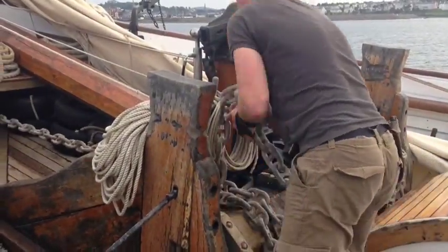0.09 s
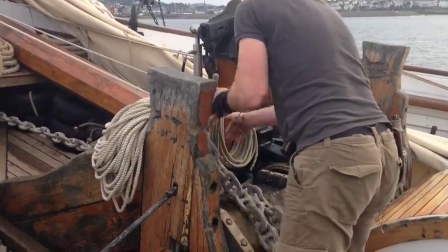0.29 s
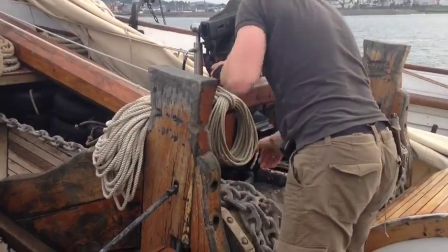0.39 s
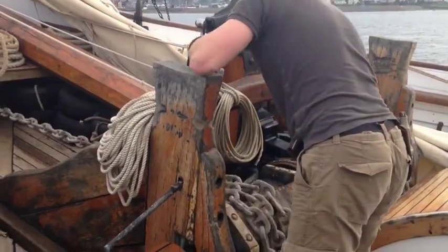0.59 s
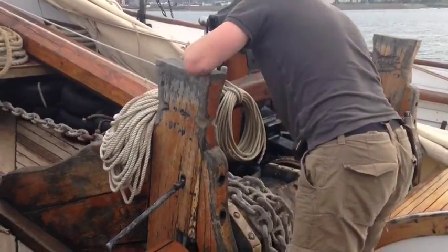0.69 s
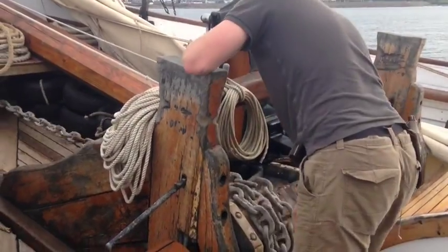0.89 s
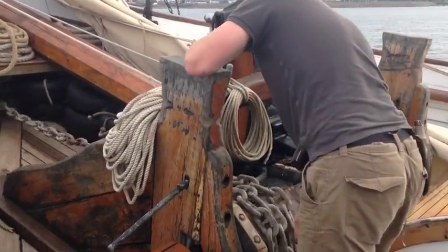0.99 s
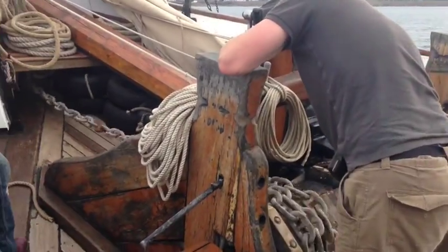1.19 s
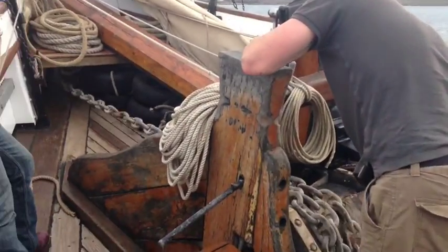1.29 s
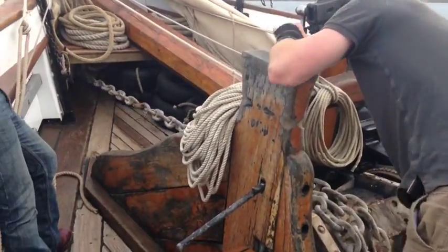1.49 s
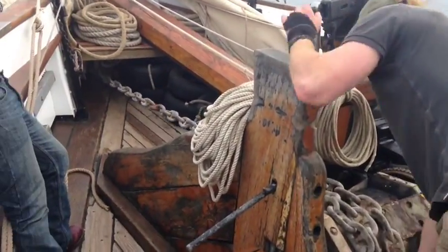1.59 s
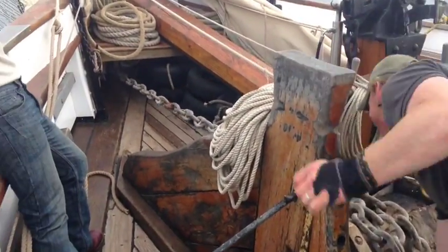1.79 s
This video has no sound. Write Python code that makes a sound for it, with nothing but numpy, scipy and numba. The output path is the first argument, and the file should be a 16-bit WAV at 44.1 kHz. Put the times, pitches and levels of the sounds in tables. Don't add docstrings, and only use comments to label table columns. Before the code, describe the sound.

Iron chain links scrape and tap on wood, tumble in a loud clanking burst with a low boom, quieten, then jerk again with hard clinks and knocks; outdoors on a ship, phone about two metres away.

```python
import sys
import numpy as np
from scipy import signal
from scipy.io import wavfile
from scipy.ndimage import uniform_filter1d
from numba import njit

SR = 44100
rng = np.random.default_rng(int(sys.argv[2]) if len(sys.argv) > 2 else 0)


def unload_wav(signal):
    wavfile.write(
        sys.argv[1],
        SR,
        np.round(np.clip(np.atleast_2d(signal).T, -1, 1) * 32767).astype(np.int16),
    )


def attenuation_scalar(level_db):
    decades = np.asarray(level_db, float) / 20
    return 10 ** decades


N = 79380

# (time [s], peak level [dB], first ring [Hz], ring t60 [s])
CLINKS = [(0.0511, -18, 4620, 0.036), (0.1357, -36, 4730, 0.094), (0.1753, -17, 5370, 0.09),
          (0.188, -11.5, 4460, 0.04), (0.1953, -12, 4620, 0.088), (0.239, -21, 5380, 0.066),
          (0.2658, -27, 4860, 0.059), (0.2863, -13.5, 5320, 0.086), (0.3218, -13, 4830, 0.062),
          (0.3768, -6, 4790, 0.06), (0.3862, -8, 4920, 0.2), (0.3943, -10, 5160, 0.088),
          (0.4223, -4, 5200, 0.18), (0.4594, -3.5, 4570, 0.049), (0.4821, -2.5, 4773, 0.23),
          (0.493, -1, 5180, 0.1), (0.519, -8, 4930, 0.083), (0.545, -8.5, 4690, 0.17),
          (0.563, -8, 5200, 0.092), (0.586, -7, 4880, 0.1), (0.625, 1.5, 4690, 0.08),
          (0.6958, -17.5, 4860, 0.12), (0.723, -18, 5270, 0.088), (0.733, -12, 4800, 0.13),
          (0.7694, -10.5, 4967, 0.11), (0.804, -19, 4880, 0.097), (0.835, -23.5, 4900, 0.19),
          (0.901, -21.5, 5250, 0.11), (0.9332, -15, 4560, 0.023), (0.9579, -18.5, 4840, 0.12),
          (0.9932, -18, 4810, 0.046), (1.053, -19.5, 4770, 0.07), (1.0832, -20.5, 5390, 0.098),
          (1.1026, -3.5, 5215, 0.1), (1.1411, -3.5, 4757, 0.064), (1.217, -12.5, 4856, 0.075),
          (1.246, -6, 5035, 0.035), (1.251, 0.5, 4750, 0.045), (1.285, -21, 4730, 0.046),
          (1.3037, -17, 5270, 0.022), (1.318, -12.5, 5400, 0.015), (1.3257, -4, 4660, 0.04),
          (1.336, -11, 4670, 0.035), (1.3585, 6, 4970, 0.022), (1.375, -12, 4900, 0.03),
          (1.3834, -4.5, 4967, 0.052), (1.4076, -20, 4710, 0.046)]
# (frequency [Hz], level [dB], share of the ring t60 [1])
LINK_MODES = [(4880, 0, 0.72), (5270, -9, 0.99), (4690, -10.5, 0.81), (5043, -3, 0.74), (3280, -17.5, 0.32),
              (4247, -13, .25), (7590, -21.5, 0.28), (7908, -13, .55), (8140, -13.5, 0.63),
              (10800, -21.5, 0.86), (11650, -20.5, 0.94), (12724, -19, 0.45), (9300, -35.5, 0.29)]
# (time [s], loose rattle level [dB], drag over deck level [dB])
CHAIN_MOTION = [(0, -57, -35.5), (.13, -63, -45.5), (.21, -43, -30), (.364, -34.5, -30), (.378, -20, -25),
                (.54, -18.5, -20), (.64, -25, -32.5), (.72, -46, -31.5), (.86, -42.5, -38),
                (1.0, -49.5, -28), (1.2, -56, -29.5), (1.3, -42, -27.5), (1.42, -72, -24.5),
                (1.49, -96, -48)]
# (centre [Hz], width [Hz], amount taken out [dB])
RING_GAPS = [(6350, 1000, -1.5), (9100, 800, -3)]
# (time [s], peak level [dB], brightness [dB], scrape length [s])
KNOCKS = [(0.023, -26.5, -12.5, 0.022), (0.041, -29.5, -5, 0.013), (0.125, -35.5, -1.5, 0.0096),
          (0.151, -20.5, -19, 0.011), (0.161, -32, 0, 0.012), (0.1755, -18, -2, 0.008),
          (0.194, -24, 0, 0.006), (0.214, -14.5, -46, 0.012), (0.2406, -14.5, 3.5, 0.0042),
          (0.2645, -12, -1, 0.004), (0.282, -11, -22.5, 0.022), (0.372, -0.5, -16, 0.029),
          (0.41, -8.5, -12, 0.0076), (0.445, -2.5, -21.5, 0.028), (0.483, -10, -9.5, 0.012),
          (0.537, -22.5, -13.5, 0.0034), (0.583, -16, -6.5, 0.017), (.622, -11.5, -14.5, 0.017),
          (0.647, -6.5, -18.5, 0.015), (.775, -19, -5.5, 0.0066), (0.854, -16, -17, 0.027),
          (0.881, -12.5, -20.5, 0.016), (0.939, -25, -1.5, 0.022), (0.987, -9.5, -6.5, 0.015),
          (1.054, -1, -14, 0.017), (1.144, -18.5, -3, 0.014), (1.211, -21.5, -4, 0.0094),
          (1.243, -14.5, -7.5, 0.015), (1.264, -2.5, -12, 0.012), (1.299, -14, -10, 0.015),
          (1.378, -23.5, 2, 0.021), (1.406, -14, -4, 0.015)]
# (centre [Hz], width [Hz], level [dB])
DECK = [(130, 153, -4), (233, 100, -1), (347.7, 102, -2), (488, 61, 1), (683, 210, -7)]
# (centre [Hz], width [Hz], level [dB])
BEAM = [(870, 410, -6), (1206, 330, 4), (1364, 154, 7), (1639, 297, 3), (2026, 325, 0.5), (3605, 1350, -7),
        (6540, 10000, -22)]
# (time [s], level [dB], frequency [Hz])
THUDS = [(0.04, -6.5, 103.7), (.40, -9, 355), (.455, -10, 335), (.50, 4, 205), (.55, -10, 209),
         (.625, -14, 210), (1.019, -11, 104), (1.09, -17.5, 89.5), (1.219, -9, 105.3), (1.373, -7.5, 114.5),
         (1.454, -17, 110), (1.501, -23, 130)]
# (time [s], level [dB], frequency [Hz])
TAPS = [(.149, -18, 600), (0.186, -15, 468), (.219, -15.5, 490), (0.241, -24, 1650), (0.267, -21, 1500),
        (.288, -23, 600), (0.351, -13.5, 366), (0.3729, -1.5, 340), (.381, -13, 450), (0.391, -4, 420),
        (.441, -4.5, 330), (.468, -6, 300), (0.504, -5.5, 260), (0.65, -9.5, 280), (.66, -17, 450),
        (0.091, -30, 417), (.71, -25, 220), (0.778, -14, 1640), (.884, -14, 584), (.897, -19, 420),
        (0.907, -15.5, 500), (1.305, -18, 600), (1.409, -19, 1500)]
# (centre [Hz], width [Hz], level [dB])
PLANKS = [(128, 30, -7.5), (205, 96, -4.5), (365.6, 153, -1.5), (439, 144, -3.5)]
# (start [s], full [s], hold [s], end [s])
FALL_S = (.372, .38, .56, .72)
# (start [s], full [s], hold [s], end [s])
HUM_S = (.9, 1.0, 1.45, 1.58)
# (start [s], full [s], hold [s], end [s])
SLIDE_S = (.8, .9, 1.36, 1.44)
# (frequency [Hz], density [dB per Hz])
AIR_SPECTRUM = [(25, -15), (50, -0.5), (105, -3), (160, -24), (450, -23.5), (1600, -35), (2500, -49),
                (15000, -54)]
# (lowest [s], back at full
# level [s])
AIR_DIP_S = (1.53, 1.7)
# (start [s], end [s])
TOP_OPEN_S = [
    (0, .29),
    (.365, .40),
    (.86, 1.11),
    (1.16, 1.36),
    (1.46, 2),
]

BOUNCE_S, BOUNCE_DB = 0.006, -5
RATTLE_PER_S, RATTLE_T60_S, RATTLE_DB, RATTLE_SCATTER_DB = 200, 0.16, 0.5, 3
LINK_HZ, LINK_SPREAD = 4860, 0.02
MODE_SCATTER_DB, CONTACT_S = 3.5, 0.00071
SOFT_DULL = 0.27
TICK_DB, TICK_S = -16.5, 0.0062
DRAG_PER_S, DRAG_SCATTER_DB, DRAG_BEAM_DB = 660, 2.5, -15.5
THUD_T60_S, TAP_CYCLES = 0.081, 6
HUM_HZ, HUM_DB, FALL_DB = 113.7, -32.5, -14.5
SLIDE_DB, AIR_DB, AIR_DIP_DB = -52, -37, -8
ECHO_T60_S, ECHO_DB = 0.12, -13
CLIP, SHELF_DB = 0.95, -5


def links():
    at, db, hz, t60 = np.array(CLINKS).T
    chance = rng.random((len(at), 2)).T
    out = strike(at, db - 4, hz, t60)
    for k in (1, 2):
        delay = BOUNCE_S * t60 / 0.078 * (k - 0.6 + chance[k - 1])
        bounce_hz = hz * (1 + 0.02 * (chance[2 - k] - 0.5))
        out = out + strike(at + delay, db - 5 + k * BOUNCE_DB, bounce_hz, t60)

    wait, size, pitch = rng.random((500, 3)).T
    at = np.cumsum(-np.log(wait + 1e-9)) / RATTLE_PER_S
    db = 20 * np.log10(motion_gain(at, 1)) + RATTLE_DB - RATTLE_SCATTER_DB * np.log(size + 0.051)
    db = np.where(at < 1.45, db, -150)
    hz = LINK_HZ * (1 + LINK_SPREAD * (2 * pitch - 1))
    return out + strike(np.minimum(at, 1.6), db, hz, np.full(len(at), RATTLE_T60_S))


def strike(at, db, hz, t60):
    out, tick = np.zeros(N), np.zeros(N)
    mode_hz, mode_db, mode_share = np.array(LINK_MODES).T
    upper = mode_hz > 6000
    chance = rng.standard_normal((len(at), 2, len(mode_hz)))
    chance[:, :, 0] = 0
    ring_hz = mode_hz * (1 + np.where(upper, 0.02, 0.009) * chance[:, 0])
    ring_hz[:, 0] = hz
    dulling = SOFT_DULL * upper * (db[:, None] + 5)
    gain = attenuation_scalar(db[:, None] + mode_db + MODE_SCATTER_DB * chance[:, 1] + dulling)
    ring_t60 = np.clip(t60[:, None] * mode_share, 0.004, 1)
    ring(out, np.repeat(at, len(mode_hz)), ring_hz.ravel(), ring_t60.ravel(), gain.ravel(), CONTACT_S)

    np.add.at(tick, (at * SR).astype(int), attenuation_scalar(db + TICK_DB))
    tick = signal.lfilter([1], [1, -np.exp(-1 / (TICK_S * SR))], tick)
    tick = uniform_filter1d(tick, size=40) * rng.standard_normal(N)
    return out + resonate(tick, [(3760, 1400, 11.0), (7700, 3900, 2.5), (12000, 4000, -24.5)])


def motion_gain(t, column):
    m = np.array(CHAIN_MOTION)
    return attenuation_scalar(np.interp(t, m[:, 0], m[:, column], right=-90))


def timber(t):
    low, high = np.zeros(N), np.zeros(N)
    chatter = grains(2200, 2.5)
    for at, db, bright_db, length in KNOCKS:
        u = np.clip(t - at, 0, 1) / max(length, 0.002)
        envelope = (t >= at) * np.exp(-u) * (1 - np.exp(-u * 9))
        blow = attenuation_scalar(db) * envelope * chatter
        blow[int(at * SR) + 20] += attenuation_scalar(db + 5.5)
        low = low + blow
        high = high + attenuation_scalar(bright_db) * blow
    drag = (t < 1.485) * motion_gain(t, 2) * grains(DRAG_PER_S, DRAG_SCATTER_DB)
    soft_drag = uniform_filter1d(drag, size=5)
    deck = resonate(attenuation_scalar(12.5) * low + attenuation_scalar(18) * drag, DECK)
    deck = resonate(deck, [(350, 1290, 0.0065)])
    return deck + resonate(attenuation_scalar(12.5) * high + attenuation_scalar(19.5 + DRAG_BEAM_DB) * soft_drag, BEAM)


def hull(t):
    out = np.zeros(N)
    at, db, hz = np.array(THUDS).T
    ring(out, at, hz, np.full(len(at), THUD_T60_S), attenuation_scalar(db), 0.006)
    at, db, hz = np.array(TAPS).T
    ring(out, at, hz, TAP_CYCLES / hz, attenuation_scalar(db + 6), 0.0004)
    hum = resonate(grains(320, 2.34), [(HUM_HZ, 60, 0)])
    hum = set_rms(resonate(hum, [(HUM_HZ, 90, 0)]), HUM_DB)
    boom = set_rms(resonate(resonate(grains(350, 2.2), PLANKS), PLANKS), FALL_DB)
    hum_gain = np.interp(t, HUM_S, (0, 1, 1, 0))
    fall_gain = np.interp(t, FALL_S, (0, 1, 1, 0)) ** 2
    return out + hum_gain * hum + fall_gain * boom


def slide(t):
    hiss = resonate(rng.standard_normal(N), [(11500, 10000, 0)]) * attenuation_scalar(2.5 * walk(20))
    return np.interp(t, SLIDE_S, (0.1, 1, 1, 0)) * set_rms(hiss, SLIDE_DB)


def air(t):
    out = 0
    spectrum_hz, spectrum_db = np.array(AIR_SPECTRUM).T
    swell_db = np.interp(t, (0, *AIR_DIP_S), (0, AIR_DIP_DB, 0))
    for hz in 30 * 2 ** np.arange(0, 9.1, 0.5):
        db = np.interp(np.log(hz), np.log(spectrum_hz), spectrum_db)
        db = db + 1.1 * walk(11.0) + (hz > 300) * swell_db
        band = [(hz, hz / 2, 0)]
        out = out + attenuation_scalar(db) * resonate(resonate(rng.standard_normal(N), band), band)
    return set_rms(out, AIR_DB)


@njit
def ring(out, at, hz, t60, gain, rise):
    rise_step = np.exp(-1 / (rise * SR))
    for k in range(len(at)):
        turn = np.exp((2j * np.pi * hz[k] - np.log(1000.) / t60[k]) / SR)
        phasor = gain[k] + 0j
        unrisen = 1.
        for i in range(int(at[k] * SR), min(len(out), int((at[k] + 1.2 * t60[k]) * SR))):
            unrisen *= rise_step
            out[i] += phasor.imag * (1 - unrisen)
            phasor *= turn


def resonate(x, peaks):
    out = 0
    for k, (hz, width, db) in enumerate(peaks):
        b, a = signal.iirpeak(hz, hz / width, fs=SR)
        out = out + (-1) ** k * attenuation_scalar(db) * signal.lfilter(b, a, x)
    return out


def grains(per_s, scatter_db):
    when, sign, size = rng.random((3, N))
    impacts = (when < per_s / SR) * np.sign(sign - 0.5)
    return set_rms(impacts * attenuation_scalar(-scatter_db * np.log(size + 0.015)), 0)


def walk(rate):
    k = int(SR / rate)
    steps = np.repeat(rng.standard_normal(N // k + 1), k)
    return 0.54 * uniform_filter1d(uniform_filter1d(steps, k), k)[:N]


def set_rms(x, db):
    return x * attenuation_scalar(db) / np.sqrt(np.mean(x ** 2) + 1e-18)


def scene():
    t = np.arange(N) / SR
    near = links() + timber(t)
    for gap in RING_GAPS:
        near = near - resonate(near, [gap])
    near = near + slide(t)
    tail = rng.standard_normal(8000) * attenuation_scalar(-60 * t[:8000] / ECHO_T60_S)
    tail = attenuation_scalar(ECHO_DB) * tail / np.sqrt(np.sum(tail ** 2))
    echo = signal.fftconvolve(near, tail)[:N]
    return (near + echo + hull(t) + air(t))[None]


def low_pass(x):
    return signal.sosfilt(signal.butter(12, 16300, fs=SR, output="sos"), x)


def record(dry):
    def cut(x, hz, kind, order):
        return signal.sosfilt(signal.butter(order, hz, kind, fs=SR, output="sos"), x)

    x = cut(dry, 45, "high", 2)
    x = cut(CLIP * np.tanh(x / CLIP), 15400, "low", 28)
    dull, top = cut(x, 13400, "low", 28), cut(x, 13400, "high", 28)
    t = np.arange(N) / SR
    is_open = sum((t >= start) & (t < end) for start, end in TOP_OPEN_S)
    top_gain = uniform_filter1d(is_open * 1.0, size=400)
    mix = dull + top_gain * attenuation_scalar(SHELF_DB) * top
    return low_pass(mix / max(1, np.abs(mix).max()))


dry = scene()
out = record(dry)
unload_wav(out)
```